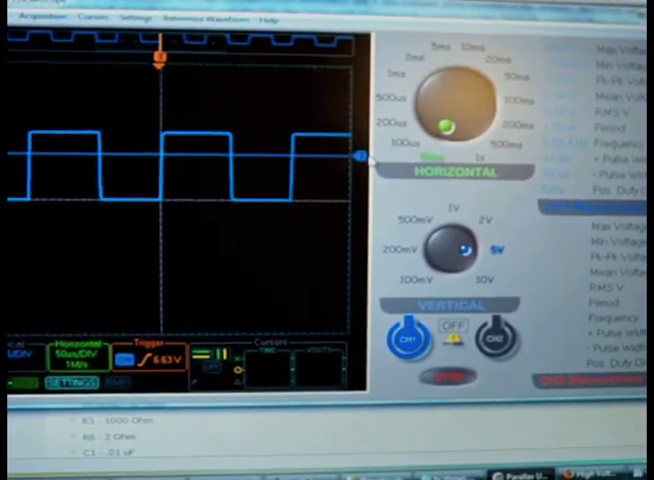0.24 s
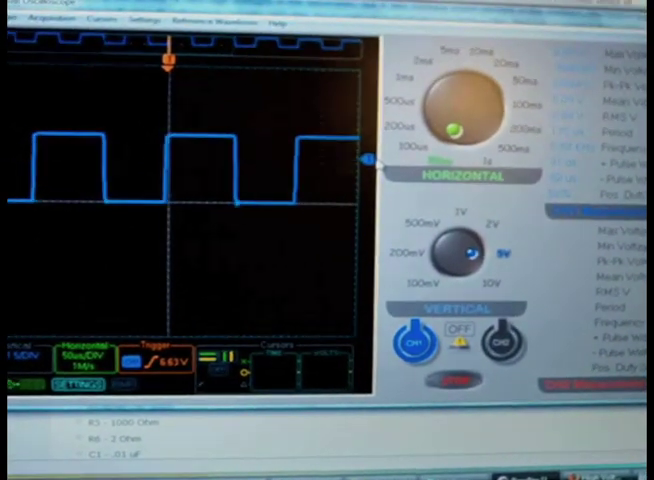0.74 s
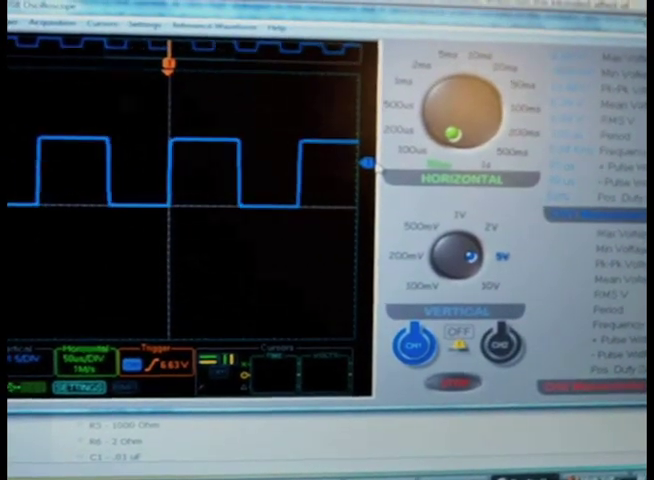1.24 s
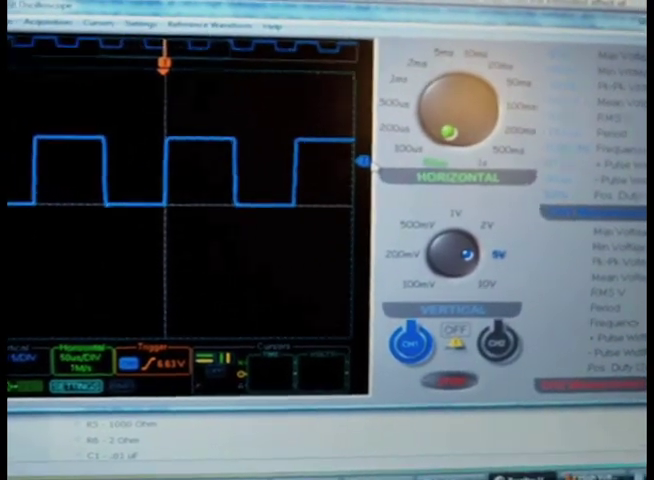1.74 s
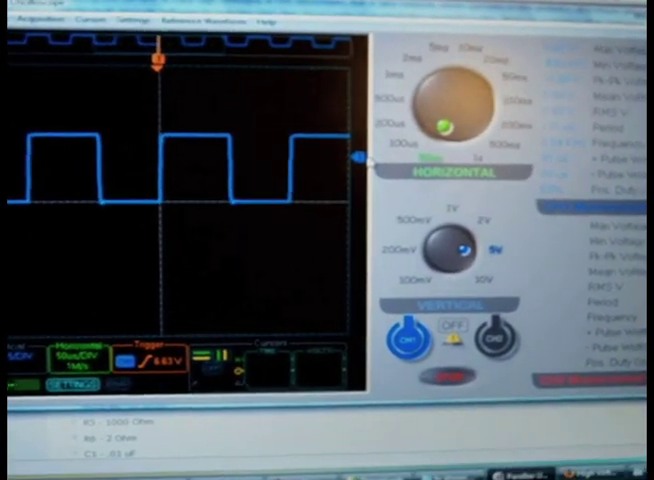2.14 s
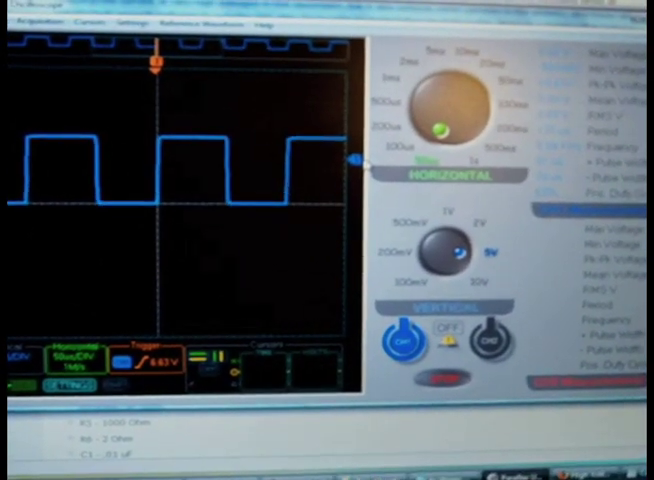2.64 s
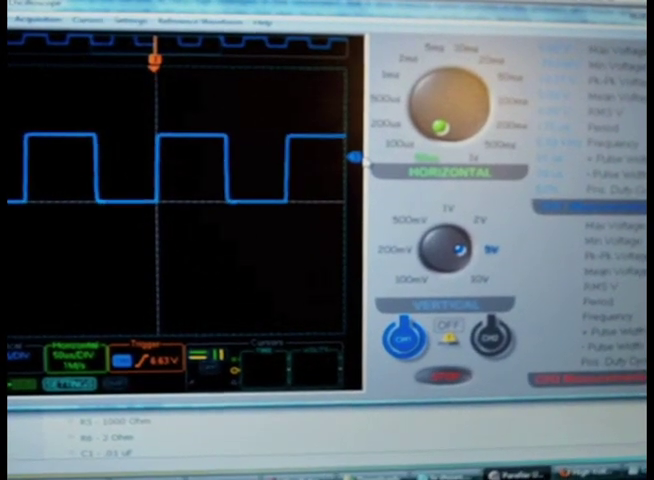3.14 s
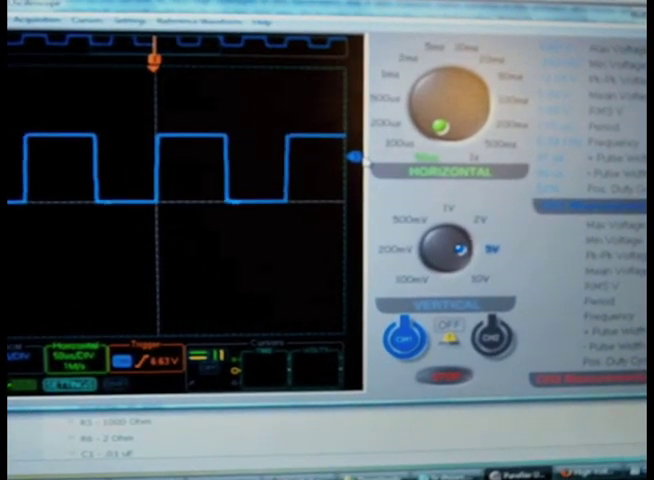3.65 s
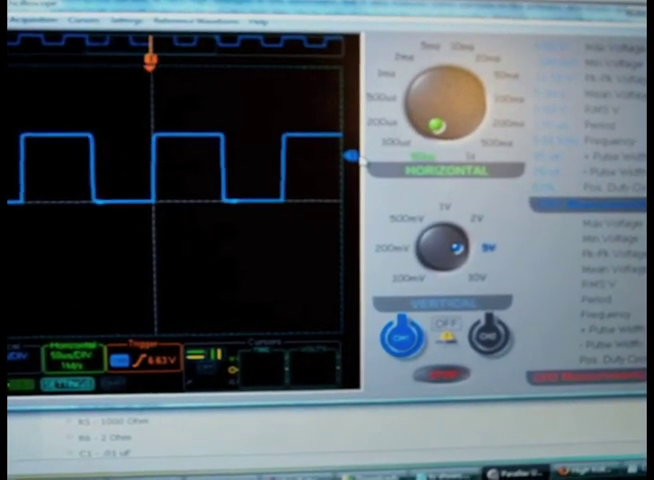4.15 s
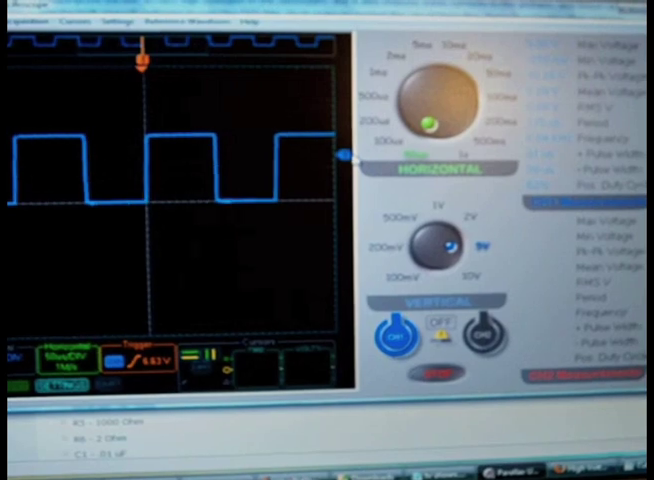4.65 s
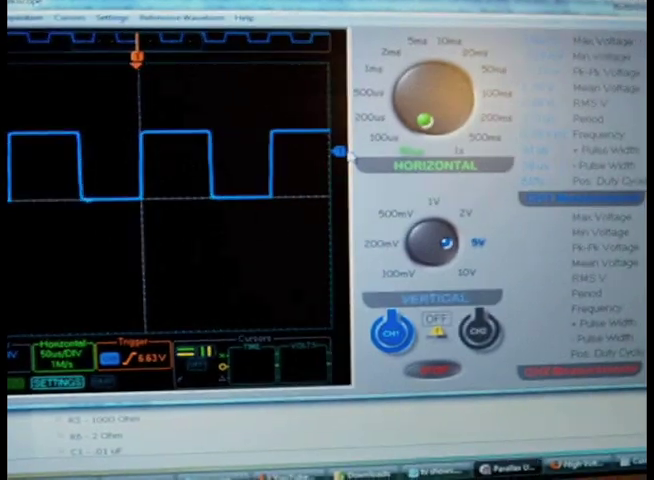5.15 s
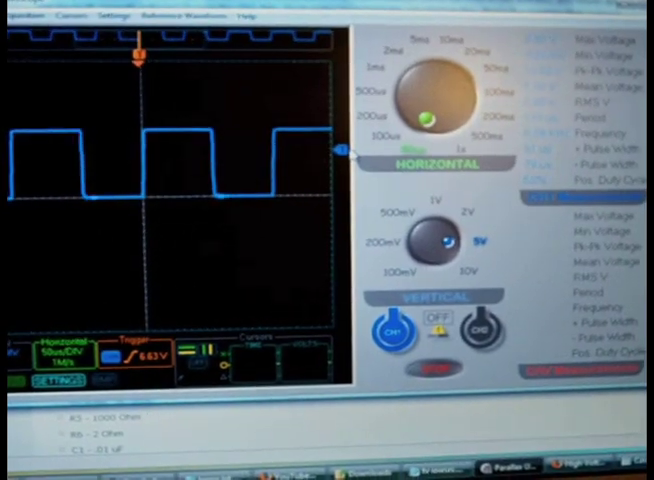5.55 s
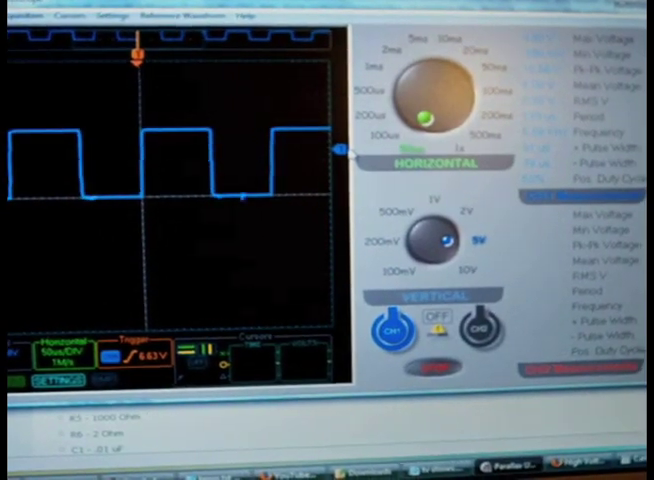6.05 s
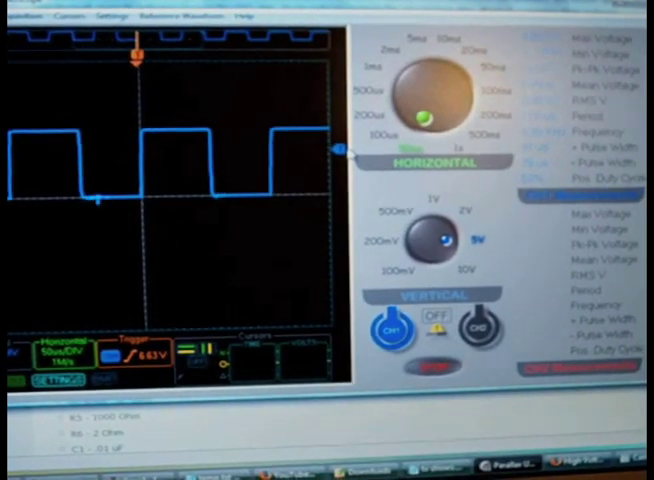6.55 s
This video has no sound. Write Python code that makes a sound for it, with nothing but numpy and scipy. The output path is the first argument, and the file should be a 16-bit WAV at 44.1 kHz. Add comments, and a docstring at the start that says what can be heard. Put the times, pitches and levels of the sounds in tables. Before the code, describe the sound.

A high-voltage driver whines very high and nearly constant in pitch, swelling and dipping in level. Soft air noise and hum lie beneath. Small ticks and faint fizzing spits give way to stuttering arc bursts, a pause, then sustained harsh crackling that grows faster and more tonal until the end. Small-room reflections, single workbench microphone, no very high treble.

```python
"""A spark gap fed by a flyback transformer spits in short bursts, then burns as a crackling arc.
Each spark is an impulse with one short crack; sparks lock to the drive cycles and their rate follows the gap.
The transformer core sings a sine at the drive frequency; its level shifts, mostly dips, after each spit.
Filtered noise makes the fan and the flutter of hot air; sines make the hum, fan tones and a faint creak.
A few plastic ticks ring as damped modes; arc and ticks sound in a small room."""
import sys
import numpy as np
from scipy import signal
from scipy.fft import rfft, irfft, next_fast_len
from scipy.io import wavfile
from scipy.ndimage import uniform_filter1d, map_coordinates

SR = 44100
rng = np.random.default_rng(int(sys.argv[2]) if len(sys.argv) > 2 else 0)


def persist_wave(psi):
    """Save psi, clipped to +-1, as 16-bit WAV."""
    counts = np.round(np.clip(psi, -1, 1) * 32767).astype(np.int16)
    wavfile.write(sys.argv[1], SR, np.atleast_2d(counts).T)


N = 299557

DRIVE_HZ = 5875
SCATTER_RATE = 1000  # reference spark rate [1/s]

# nominal breakdown rate as a hand narrows and widens the gap: (time [s], spark rate [1/s])
GAP_RATE = [(3.44, 500), (3.65, 650), (3.79, 1170), (3.93, 940), (4.02, 720), (4.08, 480), (4.31, 600),
            (4.42, 330), (5.15, 380), (5.35, 650), (5.62, 850), (5.83, 1480), (5.94, 1950), (6.11, 1920),
            (6.19, 1490), (6.41, 1120), (6.57, 1520), (6.68, 1950)]
# brief spits across the gap: (start [s], relative level [dB], length [s], spark rate [1/s],
# interval scatter [0-1], change of the whine [dB])
SPITS = [(.389, -51, .046, 4000, 0.65, -1), (.476, -46.5, 0.04, 7100, 0.5, -15.5),
         (0.965, -52, 0.013, 3300, 0.24, 2), (1.126, -42.5, 0.024, 2600, 0.11, -9.5),
         (1.165, -43.5, 0.048, 1840, 0.08, -10), (1.21, -36.5, 0.01, 1720, .08, -2),
         (1.251, -41.5, 0.037, 1958, .11, 6.5), (1.385, -39.5, 0.012, 1800, .03, -2),
         (1.401, -43.5, .022, 2937, .1, -7), (2.328, -43.5, 0.011, 2400, 0.03, -8),
         (2.597, -41, .055, 2370, 0, 1), (2.621, -46.5, 0.0092, 1500, 0.4, -2),
         (4.698, -56.5, .26, 1360, .5, 2), (5.121, -45, .03, 500, 0.5, -3)]
# each strike and burn of the arc: (start [s], length [s], relative hot level [dB], warm-up [s],
# interval scatter at SCATTER_RATE [0-1])
BURNS = [(2.136, .045, -45.5, .006, .21), (3.436, .036, -40.5, 0.017, 0.17), (3.485, 0.049, -46, .008, 0.2),
         (3.646, 0.38, -33, 0.3, .1), (4.05, .115, -36.5, .05, .17), (4.257, .085, -36.5, .04, .2),
         (4.405, .24, -38, 0.12, 0.17), (5.15, 1.614, -34, 0.59, .21)]


def amp(db):
    """Level law: decibels to amplitude gain."""
    return 10 ** (np.asarray(db) / 20)


def unit(x):
    """Normalization of power: scale to rms 1."""
    return x / np.sqrt(np.mean(x ** 2) + 1e-20)


def along(points, hz):
    """Logarithmic frequency scale: interpolate (frequency [Hz], value) points along it."""
    f, v = np.transpose(points)
    return np.interp(np.log(hz + 1), np.log(f + 1), v)


def curves(rows):
    """Linear interpolation in time: one value per sample for each column after the time."""
    s, *columns = np.transpose(rows)
    return [np.interp(np.arange(N) / SR, s, column) for column in columns]


def wobble(rate):
    """Band-limited random modulation: a smooth curve through rate random knots a second."""
    knots = rng.standard_normal(int(N * rate / SR) + 4)
    return map_coordinates(knots, [np.arange(N) * rate / SR])


def tone(hz):
    """Phase is the integral of frequency: a sine of rms 1 that follows hz."""
    cycles = np.cumsum(hz * np.ones(N)) / SR + rng.random()
    return np.sqrt(2) * np.sin(2 * np.pi * cycles)


def filtered(x, response):
    """Linear filtering: the spectrum of x times a response of frequency."""
    size = next_fast_len(N + SR // 2)
    spectrum = rfft(x, size) * response(np.fft.rfftfreq(size, 1 / SR))
    return irfft(spectrum, size)[..., :N]


def shaped_noise(spectrum):
    """Spectral shaping: noise of rms 1 with (frequency [Hz], level [dB]) as its spectrum."""
    return unit(filtered(rng.standard_normal(N), lambda hz: amp(along(spectrum, hz))))


def pulse(spectrum, size=2048):
    """Minimum phase: the causal pulse of energy 1 with this spectrum, from its folded cepstrum."""
    gain = amp(along(spectrum, np.fft.rfftfreq(size, 1 / SR)))
    cepstrum = irfft(np.log(gain + 1e-6))
    cepstrum[1:size // 2] *= 2
    cepstrum[size // 2 + 1:] = 0
    shape = irfft(np.exp(rfft(cepstrum)))
    return shape / np.linalg.norm(shape)


def impulses(times, sizes, order=8):
    """Band-limited interpolation: windowed sincs place impulses between samples."""
    at = np.asarray(times)[:, None] * SR
    taps = at.astype(int) + np.arange(1 - order, order + 1)
    offset = taps - at
    weight = np.sinc(offset) * np.cos(np.pi * offset / (2 * order)) ** 2
    return np.bincount(np.clip(taps, 0, N).ravel(), (weight * sizes[:, None]).ravel(), N + 1)[:N]


def heat(start, length, hot_db, warm_s, cold_db=-8.5, warm_curve=2.2):
    """Thermal build-up of one burn: it strikes cold, swells as a power of its age, holds and goes out."""
    age = np.arange(N) / SR - start
    warmth = np.clip(age / warm_s, 0, 1) ** warm_curve
    return amp(hot_db + cold_db * (1 - warmth)) * (age >= 0) * (age < length)


def load():
    """Arc current as electrical load: smoothed burn strength, scaled by that of the hottest burn."""
    current = sum(heat(start, length, hot_db, warm_s) for start, length, hot_db, warm_s, _ in BURNS)
    return uniform_filter1d(current / current.max(), SR // 20)


def fan(fan_db=-59):
    """Turbulence and rotation: broadband air noise with narrow tones that waver in pitch and level."""
    # spectrum of the moving air: (frequency [Hz], relative level [dB])
    air_spectrum = [(10, -14.5), (25, -5.5), (60, 2), (110, -10), (200, -10.5), (420, -15), (700, -13),
                    (1000, -12.5), (1300, -14.5), (1800, -10.5), (2600, -18.5), (4000, -24), (5500, -24.5),
                    (7000, -42)]
    # tones of the fan: (mean frequency [Hz], mean level [dB])
    lines = [(240, -74), (680, -78), (985, -72.5), (1513, -72), (1814, -72)]
    air = amp(fan_db) * shaped_noise(air_spectrum)
    for hz, db in lines:
        pitch = hz * (1 + 0.003034 * wobble(12))
        air = air + amp(db + 0.75 * wobble(6.9)) * tone(pitch)
    return air


def mains_hum(current, mains_hz=60):
    """Harmonics of the supply: steady tones that grow with the load."""
    # (multiple of the mains frequency, idle level [dB], rise under full load [dB])
    harmonics = [(1, -65.5, 4.5), (2, -70, 8), (3, -85, 4)]
    return sum(amp(db + rise_db * current) * tone(k * mains_hz) for k, db, rise_db in harmonics)


def creak():
    """Frequency glide: a short, soft, rising tone from the bench."""
    # (time [s], frequency [Hz], level [dB])
    glide = [(3.55, 265, -77), (3.59, 307, -56), (3.625, 340, -79)]
    hz, db = curves(glide)
    t = np.arange(N) / SR
    return amp(db) * tone(hz) * (t > glide[0][0]) * (t < glide[-1][0])


def ticks(tick_db=-6, crack=3, crack_t60=.02):
    """Modal decay: each impulse sets off damped plastic modes and a dry burst of band noise."""
    # moments of the ticks: (time [s], relative level [dB])
    strikes = [(0.3357, -39.5), (0.6534, -39), (1.3822, -36.5), (1.6993, -38.5), (4.9958, -34.5)]
    # modes of the plastic: (frequency [Hz], relative level [dB], 60 dB decay time [s])
    modes = [(1237, 1, 0.021), (1604, -3.5, 0.075), (1880, -20.5, 0.091), (2210, -5, 0.007),
             (2360, -12, 0.019)]
    t = np.arange(SR // 10) / SR
    ring = sum(amp(db - 60 * t / t60) * np.sin(2 * np.pi * hz * t) for hz, db, t60 in modes)
    b, a = signal.butter(3, [950, 2900], 'band', fs=SR)
    grit = signal.lfilter(b, a, rng.standard_normal(len(t)))
    one_tick = ring + crack * amp(-60 * t / crack_t60) * grit
    s, db = np.transpose(strikes)
    return signal.fftconvolve(impulses(s, amp(db + tick_db)), one_tick)[:N]


def flame(current, flame_db=-51, lag_s=0.39, growth=1.16):
    """Thermal inertia: arc power heats the air, which flutters softly and cools slowly."""
    # spectrum of the flutter: (frequency [Hz], relative level [dB])
    flutter_spectrum = [(15, -11.5), (35, 2.5), (120, -4), (240, -7), (380, -10), (900, -20), (3000, -72)]
    rate, = curves(GAP_RATE)
    # a wider, slower-firing gap draws a longer flame
    power = current ** 2 * (SCATTER_RATE / rate) ** growth
    cooling = 1 / (lag_s * SR)
    hot_air = signal.lfilter([cooling], [1, cooling - 1], power)
    return amp(flame_db) * hot_air * shaped_noise(flutter_spectrum)


def whine(current, whine_db=4.5, load_db=-0.5, flutter_db=3.0, waver_hz=9, stutter_hz=350,
          shift_delay_s=0.043, shift_width_s=0.02):
    """Forced vibration: the core sings at the drive frequency and shakes in level and pitch under load."""
    # level of the whine, slow swells and fades with some quick jumps: (time [s], relative level [dB])
    whine_level = [(0.0, -48), (0.69, -45.8), (1.1, -51.5), (1.38, -46), (1.58, -50.5), (1.67, -41.4),
                   (1.84, -40.5), (2.12, -47.7), (2.39, -59.5), (2.5, -44.7), (3.17, -47), (3.48, -44),
                   (3.69, -49.0), (4.01, -40.5), (4.06, -49), (4.2, -49), (4.22, -42), (4.47, -41),
                   (4.55, -49.5), (4.99, -43), (5.12, -51), (5.44, -55.5), (5.89, -39.8), (6.27, -45.5),
                   (6.79, -40)]
    # stutters as the gap nears breakdown: (start [s], decay [s], depth, change of the whine [dB])
    stutters = [(0.225, 0.1, 0.38, -14), (.39, 0.21, 0.42, -0.5), (0.794, .15, 0.21, -7.5)]
    db, = curves(whine_level)
    t = np.arange(N) / SR
    # a brief level change, mostly a dip, follows every spit and stutter
    shift_db = np.zeros(N)
    for s, *_, change_db in [*SPITS, *stutters]:
        shift_db += change_db * np.exp(-((t - s - shift_delay_s) / shift_width_s) ** 2)
    shake_db = current * (load_db + flutter_db * wobble(60))
    pitch = DRIVE_HZ + waver_hz * current * wobble(70)
    song = amp(db + whine_db + shift_db + shake_db) * tone(pitch)
    unrest = sum(depth * (t > s) * np.exp(-np.abs(t - s) / decay) for s, decay, depth, _ in stutters)
    jitter = unit(filtered(rng.standard_normal(N), lambda hz: 1 / (1 + (hz / stutter_hz) ** 2)))
    return song * (1 + unrest * jitter)


def breakdowns(start, end, rate, scatter, slip=0.44, size_db=6):
    """Relaxation discharge: the gap charges for whole drive cycles, then fires near a crest."""
    cycles = np.arange(round(start * DRIVE_HZ), round(end * DRIVE_HZ))
    wait_chance, slip_chance, size_chance = rng.standard_normal((3, len(cycles)))
    here = np.minimum(cycles * SR // DRIVE_HZ, N - 1)
    rate, scatter = np.broadcast_to(rate, N)[here], np.broadcast_to(scatter, N)[here]
    wait = DRIVE_HZ / rate * np.exp(scatter * wait_chance - scatter ** 2 / 2)
    wait = np.maximum(np.rint(wait), 1).astype(int)
    fired = [0]
    while fired[-1] + wait[fired[-1]] < len(cycles):
        fired.append(fired[-1] + wait[fired[-1]])
    # a restless gap also fires further from the crest and at more uneven strength
    times = (cycles + slip * np.sqrt(scatter) * slip_chance) / DRIVE_HZ
    # the rate factor keeps the mean power near 1
    sizes = amp(size_db * np.minimum(scatter, .35) * size_chance) * np.sqrt(SR / rate)
    return times[fired], sizes[fired]


def spitting(thin_hz=1900):
    """High-passed impulse trains: brief spits of small, cold sparks with little low end."""
    train = np.zeros(N)
    for s, db, length, rate, scatter, _ in SPITS:
        times, sizes = breakdowns(s, s + length, rate, scatter)
        train += impulses(times, sizes * amp(db))
    return signal.sosfilt(signal.butter(2, thin_hz, 'high', fs=SR, output='sos'), train)


def burning(wander=.04, flicker_db=1.18, scatter_fall=1.6, scatter_max=.7):
    """Breakdown rate set by gap width: a narrower gap fires faster and more evenly."""
    rate, = curves(GAP_RATE)
    unevenness = (SCATTER_RATE / rate) ** scatter_fall
    # the hot channel wanders, so the sparks hop between neighbouring fractions of the drive frequency
    rate = rate * np.exp(wander * wobble(80))
    train = np.zeros(N)
    for start, length, hot_db, warm_s, scatter in BURNS:
        local_scatter = np.minimum(scatter * unevenness, scatter_max)
        times, sizes = breakdowns(start, start + length, rate, local_scatter)
        train += impulses(times, sizes) * heat(start, length, hot_db, warm_s)
    # the burning arc flickers slightly at every gap width
    return train * amp(flicker_db * wobble(70))


def arc(arc_db=3.0, spit_db=2.0, snap_db=3.0, notch=.75, notch_width_hz=35,
        ring=0.58, ring_hz=3920, ring_width_hz=110):
    """Impulse excitation: spits, burning arc and lone snaps all sound through the same short crack."""
    # lone strong sparks: (time [s], relative strength [dB])
    snaps = [(3.4378, -22), (3.5018, -19.5), (3.5994, -21), (3.615, -19), (4.259, -13.5), (4.408, -14),
             (4.9668, -17.5), (4.9752, -15), (5.1214, -19.5), (5.153, -20)]
    # spectrum of one spark: (frequency [Hz], relative level [dB])
    crack_spectrum = [(150, -47), (250, -27), (724, -14.5), (788, -18.5), (989, -12.5), (1140, -16.5),
                      (1560, -7.5), (2000, -11.5), (2550, -13), (3200, -6), (4080, -11.5), (4700, -2.5),
                      (5570, -3.5), (6070, -5), (6990, -5), (7400, -37.5), (9620, -40.5), (16300, -120)]
    s, db = np.transpose(snaps)
    train = amp(arc_db) * burning() + amp(spit_db) * spitting() + impulses(s, amp(db + snap_db))
    cracks = signal.fftconvolve(train, pulse(crack_spectrum))[:N]

    def coloration(hz):
        """Resonance and notch: one narrow ringing peak, and little added at the drive frequency itself."""
        resonance = 1 + ring / (1 + 2j * (hz - ring_hz) / ring_width_hz)
        hollow = 1 - notch * np.exp(-((hz - DRIVE_HZ) / notch_width_hz) ** 2)
        return resonance * hollow

    return filtered(cracks, coloration)


def room(x, wet_db=-2, early_db=-5, early_t60=0.061):
    """Reverberation: near walls and the bench answer first, then the diffuse tail."""
    # (frequency [Hz], 60 dB decay time [s])
    decay = [(200, 0.55), (1500, 0.78), (3500, 0.5), (7000, 0.46)]
    hz, t, bands = signal.stft(rng.standard_normal(SR // 2), SR, nperseg=256)
    fading = bands * amp(-60 * t / along(decay, hz)[:, None])
    tail = signal.istft(fading, SR, nperseg=256)[1]
    t = np.arange(len(tail)) / SR
    tail = tail * (1 - np.exp(-t / 0.0047))  # gradual onset
    early = rng.standard_normal(len(t)) * amp(-60 * t / early_t60) * (t > .001)
    response = amp(wet_db) * tail / np.linalg.norm(tail) + amp(early_db) * early / np.linalg.norm(early)
    response[0] += 1  # direct sound
    return signal.fftconvolve(x, response / np.linalg.norm(response))[:N]


def scene():
    """Superposition: all sources add at one microphone, sent equally to two channels."""
    current = load()
    background = fan() + mains_hum(current) + creak() + room(ticks(), wet_db=-7.5, early_db=-8.5)
    mono = background + flame(current) + whine(current) + room(arc())
    return np.array([mono, mono])


def record(dry, top_hz=7430):
    """Band limitation: the response falls from 1 to 0 between 150 Hz below and 150 Hz above top_hz."""
    return filtered(dry, lambda hz: np.clip((top_hz + 150 - hz) / 300, 0, 1) ** 2)


dry = scene()
out = record(dry)
persist_wave(out)
```